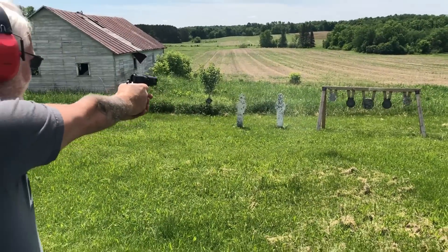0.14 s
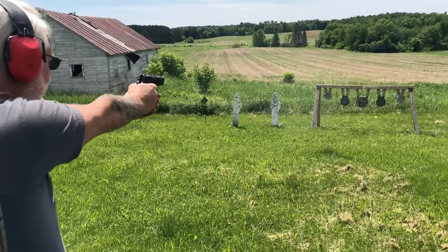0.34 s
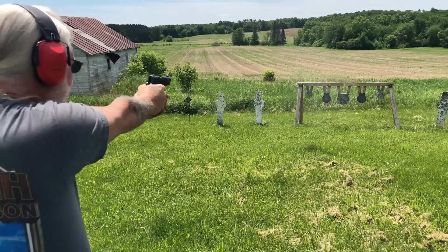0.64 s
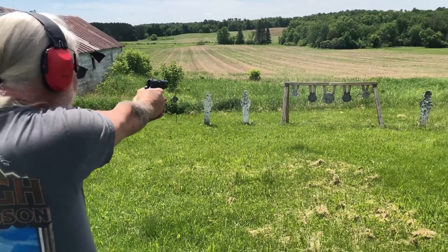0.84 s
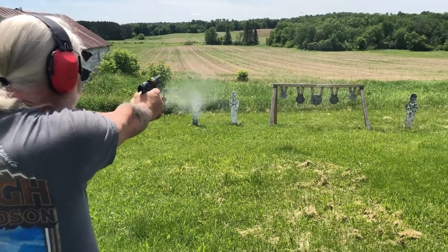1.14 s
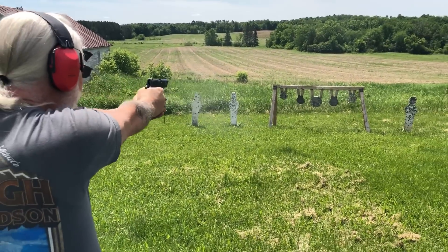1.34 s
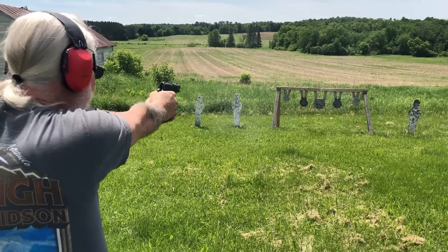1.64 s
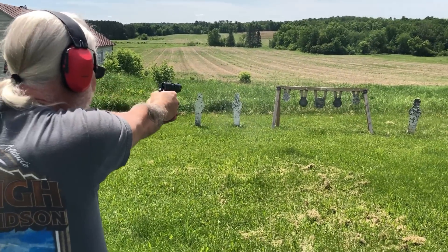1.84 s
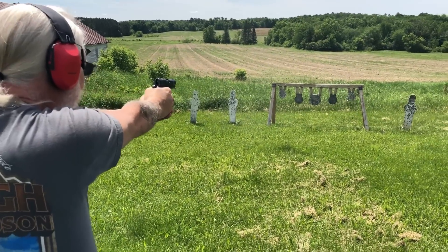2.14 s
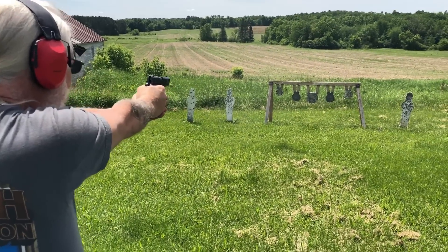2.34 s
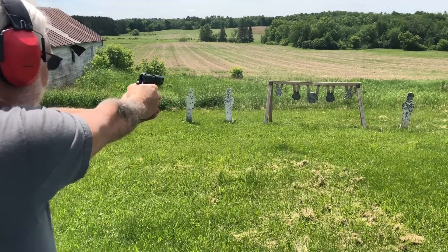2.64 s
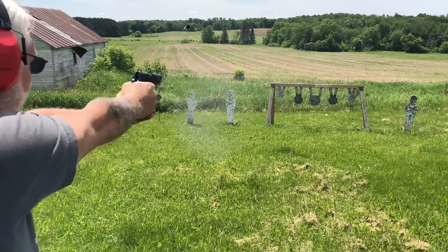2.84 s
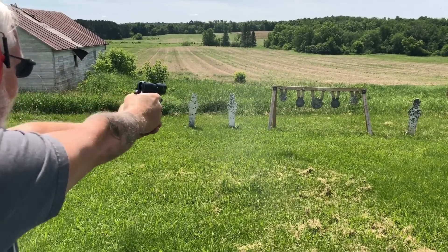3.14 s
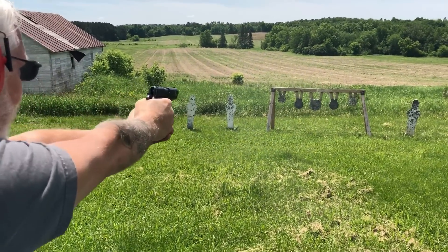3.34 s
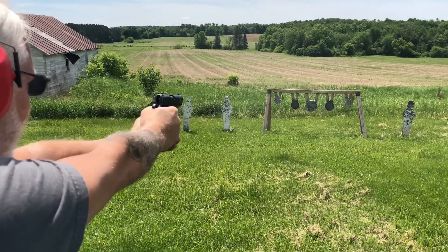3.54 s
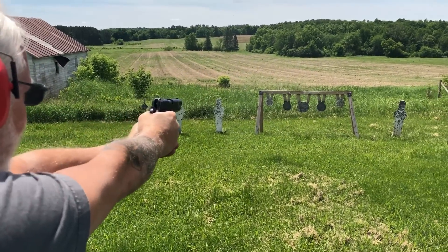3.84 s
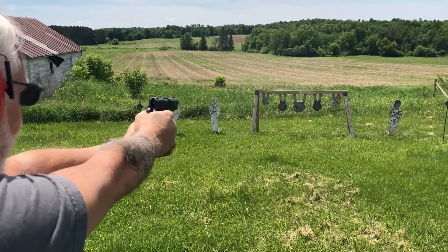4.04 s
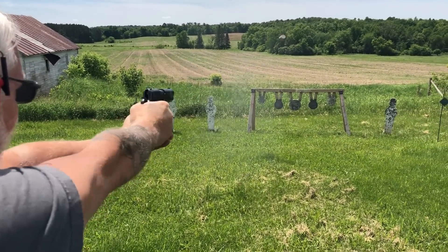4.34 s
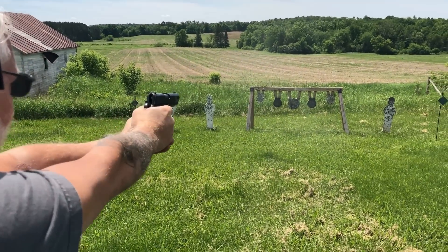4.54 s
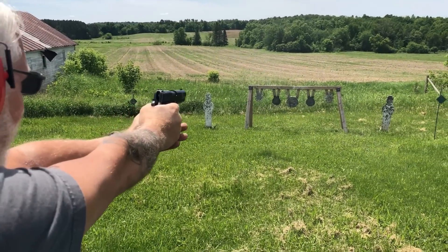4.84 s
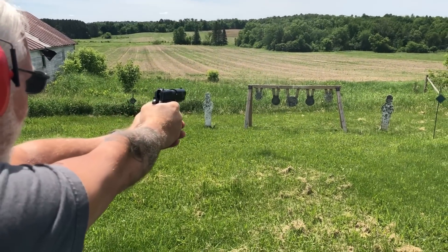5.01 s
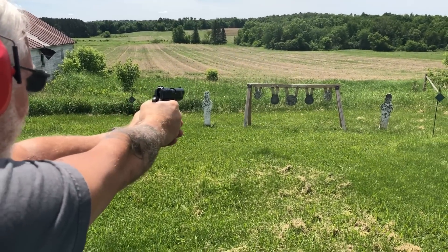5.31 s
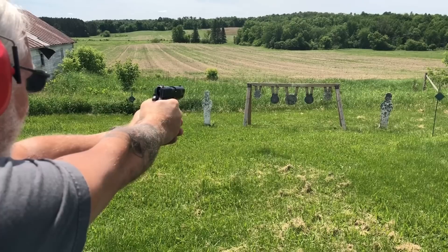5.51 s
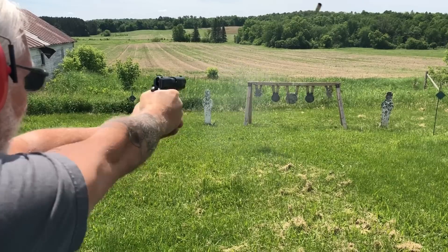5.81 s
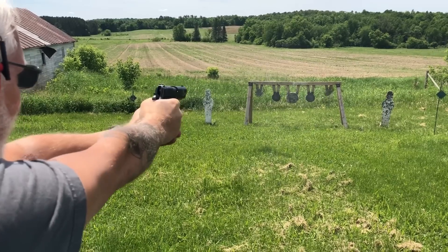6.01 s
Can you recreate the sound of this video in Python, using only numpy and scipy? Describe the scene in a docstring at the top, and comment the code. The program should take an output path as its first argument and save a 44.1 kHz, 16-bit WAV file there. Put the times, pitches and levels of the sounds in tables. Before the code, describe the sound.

Four close handgun shots crack across a grassy range, each followed by a bullet hit and soft echo; the first and last ring steel.

```python
"""A grassy outdoor range in a light breeze. A pistol fires four single shots about a metre from a small
microphone, overloading it. The slide cycles, each bullet smacks the targets, and twice the steel rings.
A barn and bushes slap back; a second later the far woods return a soft roll.
Faint around the shots: swells of hiss, grip ticks, a bump on the microphone, a far bird."""
import sys
import numpy as np
from scipy import signal
from scipy.fft import rfft, irfft
from scipy.io import wavfile
from scipy.ndimage import uniform_filter1d

SR = 44100
rng = np.random.default_rng(int(sys.argv[2]) if len(sys.argv) > 2 else 0)


def generate_wav(sig):
    """Save sig (samples, or channels by samples) to the path in sys.argv[1] as 16-bit PCM at SR."""
    pcm = np.round(np.clip(np.atleast_2d(sig).T, -1, 1) * 32767).astype(np.int16)
    wavfile.write(sys.argv[1], SR, pcm)


N = 272097
TIME_S = np.arange(N) / SR

# Each row: start in seconds, crack level in dB, crack t60 in seconds, then levels in dB of bark, boom,
# thump, slide, barn slap, echoes, first gas puff, second gas puff.
PISTOL_SHOTS = [(1.3259, -6.5, 0.0056, -15.5, -9.5, -25, -24.5, -7.5, -4, -49, -38.5),
                (2.9299, -7, 0.046, -24.5, -12.5, -21.5, -22, -12, -4, -47.5, -57.5),
                (4.4429, -8.5, 0.063, -22.5, -13, -19.5, -22.5, -12, -6, -29, -21.5),
                (5.8974, -9.5, 0.071, -24, -14.5, -20, -19, -10, -5.5, -25.5, -42)]
(FIRED_S, CRACK_DB, CRACK_T60_S, BARK_DB, BOOM_DB, THUMP_DB, SLIDE_DB, SLAP_DB, ECHO_DB,
 FIRST_PUFF_DB, SECOND_PUFF_DB) = np.transpose(PISTOL_SHOTS)
# Hollow note in the report. Each entry: one shot's level in dB.
HOLLOW_NOTE_DB = [-30, -33, -36.5, -36]
# Each row: peak time in seconds, level in dB, then rise, hold and t60 in seconds.
BULLET_HITS = [(1.389, -32.5, 0.0026, .004, .22), (3.011, -19, .006, 0.011, 0.044),
               (4.526, -17.5, 0.0078, .01, 0.095), (5.979, -24.5, .006, .006, .14)]
# Steel targets. Each row: frequency in Hz, relative level in dB, t60 in seconds.
SILHOUETTE_MODES = [(3520, -7, 0.47), (4430, -16, 0.5), (5535, -13, .25), (6150, 6, 0.25),
                    (6100, -30, 0.97), (6782, -14, .25), (7520, -21, .35), (8700, -0.5, .08),
                    (12120, -14.5, 0.17), (13700, -8.5, .07)]
PLATE_MODES = [(3600, -17, .44), (3760, -17, .25), (4430, -22, .22), (5010, -11.5, 0.33), (5840, 2, 0.082),
               (5850, -19, .5), (6210, -9.5, 0.38), (6820, -14, 0.23), (7450, -29, .25), (8720, 2.5, 0.23),
               (9320, -9, .15), (9500, -15, 0.36), (11290, -6, 0.16), (11460, -6, .11), (14020, -8, 0.17)]
# Each row: round trip in seconds, relative level in dB, then rise, hold and t60 in seconds.
WOOD_ECHOES = [(.93, -51.5, 0.046, 0.049, 1.2), (1.129, -52, 0.39, 0.14, 0.51),
               (1.428, -48, 0.057, 0.06, 1.7), (1.776, -44, 0.22, .08, 1.21)]
# Frames and bushes. Each row: round trip in seconds, relative thud and snap in dB, thud t60 in seconds.
NEAR_ECHOES = [(0.097, -26, -31, .06), (.108, -12, -32.5, 0.047), (.125, -12, -17.5, 0.071),
               (.132, -16, -29.5, 0.072), (0.15, -20.5, -25, 0.031), (0.168, -29, -27, .05),
               (.184, -27.5, -52, 0.062), (.193, -43, -49, .03), (.231, -29, -34, 0.065),
               (.249, -31, -42, 0.12), (.266, -43, -43, .09), (.287, -43, -49, 0.056),
               (.303, -41.5, -58, .07), (0.356, -40.5, -63, 0.06), (0.377, -40, -67, 0.049),
               (.481, -45.5, -65, 0.065), (0.503, -46.5, -66, 0.066), (.542, -56, -65, 0.042),
               (.629, -73, -77, .07)]
# Grass and brush scatter. Each row: frequency in Hz, t60 in seconds.
FIELD_DECAY = [(100, 0.226), (700, 0.3), (2500, 0.41), (6000, 0.33), (13000, 0.23)]
# Hiss. Each row: centre in seconds, level in dB, half-width in seconds.
FAINT_SWELLS = [(0.21, -69, 0.38), (0.862, -67.5, 0.059), (0.948, -61, 0.021), (1.035, -62, 0.027),
                (1.108, -65, 0.022), (1.267, -67, 0.091), (2.3, -69, 0.069), (2.623, -74, 0.024),
                (2.77, -71.5, 0.064), (4.335, -58, 0.0094), (4.393, -60.5, 0.034)]
# Handling. Each row: peak time in seconds, level in dB.
GRIP_TICKS = [(1.782, -69), (3.732, -69), (5.098, -63), (5.302, -68)]
HOUSING_BUMPS = [(3.675, -48)]
# Each row: centre in seconds, level in dB, start and end pitch in Hz, length in seconds.
BIRD_CHIRPS = [(5.711, -75, 5370, 5780, 0.012), (5.776, -68.5, 7450, 5890, .022)]
# Noise spectra. Each row: frequency in Hz, relative density in dB.
BREEZE_SPECTRUM = [(25, -31), (60, -13.5), (115, -8), (190, -16), (260, -18.5), (400, -9.5), (600, 0.5),
                   (900, -2), (1500, -12.5), (3000, -17.5), (5000, -26.5), (9000, -45), (15000, -48)]
HISS_SPECTRUM = [(500, -22), (1400, -1), (2500, 6.5), (5000, -2), (9000, -15), (15000, -18)]
ROLL_SPECTRUM = [(30, -37), (70, -14), (120, -8), (190, -16), (280, -15), (480, -3.5), (750, 2.5),
                 (1050, -2.5), (1600, -10), (3000, -19), (5000, -31.5), (9000, -50.5), (15000, -54)]
CRACK_SPECTRUM = [(40, -29), (90, -19), (160, -3), (330, -8.5), (480, -4.5), (950, -10), (1700, -9),
                  (3500, -8.5), (7000, -10.5), (15000, -13.5)]
BARK_SPECTRUM = [(300, -31.5), (1300, -2.5), (2050, -14.5), (2200, 7), (2420, 3.5), (2570, -14.5),
                 (3050, -1.5), (3600, -12.5), (3760, 5), (4300, 3), (4520, -17.5), (5250, -14), (5620, 1.5),
                 (5850, -14), (6600, -24.5), (15000, -38.5)]
BOOM_SPECTRUM = [(40, -40.5), (130, -25), (230, -10.5), (320, -9.5), (480, 6), (640, -1), (850, 7),
                 (1100, 4.5), (1700, -8.5), (4000, -22), (15000, -41.5)]
SLIDE_SPECTRUM = [(100, -17), (450, -4), (1000, 7.5), (2800, -10), (6000, -6.5), (15000, -10)]
FIELD_SPECTRUM = [(40, -23.5), (90, -9), (180, -12), (320, -12.5), (550, -6), (950, 0.5), (1600, -8),
                  (3500, -10.5), (7000, -13), (15000, -20.5)]
BRUSH_SPECTRUM = [(40, -24), (120, -12.5), (280, -16), (520, 4), (900, -5), (1800, -7), (4000, -10.5),
                  (7000, -18.5), (10000, -27), (15000, -36.5)]
SLAP_SPECTRUM = [(100, -23.5), (500, -7.5), (1000, -7.5), (2500, -14), (4000, -8.5), (8000, -15),
                 (15000, -12.5)]
IMPACT_SPECTRUM = [(40, -22), (130, -5.5), (400, -7.5), (1000, -5), (2500, 0.5), (5500, 1.5), (9000, -1),
                   (15000, -2)]
THUD_SPECTRUM = [(40, -42.5), (90, -2), (150, -18), (230, -10.5), (330, -3), (480, 6.5), (1000, 5),
                 (1700, -10), (3500, -19.5), (8000, -42.5)]
SNAP_SPECTRUM = [(300, -23), (1200, 0), (2500, 0.5), (5000, 1), (9000, -1.5), (15000, -15.5)]


def from_db(db):
    """Decibels to gain."""
    return 10 ** (np.asarray(db) / 20)


def at_hz(table, hz):
    """Table lookup along log frequency."""
    known_hz, values = np.transpose(table)
    return np.interp(np.log(np.maximum(hz, 1)), np.log(known_hz), values)


def colour(x, spectrum, size=4096):
    """Minimum-phase filter; white noise keeps its level."""
    bins_hz = np.arange(size // 2 + 1) * SR / size
    cepstrum = irfft(np.log(from_db(at_hz(spectrum, bins_hz))))
    cepstrum[1:size // 2] *= 2
    cepstrum[size // 2 + 1:] = 0
    response = irfft(np.exp(rfft(cepstrum)))
    return signal.oaconvolve(x, response / np.linalg.norm(response))[:N]


def lowpass(x, hz, order=2):
    """Butterworth low-pass."""
    return signal.sosfilt(signal.butter(order, hz, fs=SR, output="sos"), x + 1e-18)


def bandpass(x, low_hz, high_hz):
    """Butterworth band-pass."""
    return signal.sosfilt(signal.butter(3, [low_hz, high_hz], "band", fs=SR, output="sos"), x)


def grains(spread_db):
    """Dense clicks of uneven size, rms 1."""
    noise = rng.standard_normal(N)
    noise *= from_db(spread_db * np.repeat(rng.standard_normal(N // 16 + 1), 16)[:N])
    return noise / noise.std()


def even_noise(spectrum, spread_db, window_s=0.0032):
    """Coloured grains held at rms 1, so a short burst hits at full force."""
    noise = colour(grains(spread_db), spectrum)
    return noise / np.sqrt(uniform_filter1d(noise ** 2, int(window_s * SR)) + 1e-12)


def flutter(depth_db, rate_hz):
    """Randomly wandering gain."""
    slow = lowpass(rng.standard_normal(N), rate_hz)
    return from_db(depth_db * slow / slow.std())


def swell(peak_s, rise_s, t60_s, hold_s=0):
    """Envelope: linear rise to 1, hold, exponential decay."""
    start, stop = np.searchsorted(TIME_S, [peak_s - rise_s, peak_s + hold_s + 2 * t60_s])
    t = TIME_S[start:stop] - peak_s
    out = np.zeros(N)
    out[start:stop] = np.minimum(1 + t / rise_s, 1) * from_db(-60 * np.maximum(t - hold_s, 0) / t60_s)
    return out


def after_shots(levels_db, delay_s, rise_s, t60_s, hold_s=0):
    """One swell per shot, peaking delay_s after it."""
    length = int((delay_s + hold_s + 2 * t60_s) * SR)
    shape = swell(delay_s, min(rise_s, delay_s), t60_s, hold_s)[:length]
    out = np.zeros(N)
    for start, db in zip((FIRED_S * SR).astype(int), levels_db):
        out[start:start + len(shape)] += from_db(db) * shape[:N - start]
    return out


def far_return(delay_s, gain_db, rise_s, hold_s, t60_s, earlier_s=-0.55, earlier_db=-2.5):
    """Distant echo envelope. Shots add in power, including one fired before the scene opens."""
    shots = [(earlier_s, earlier_db), *zip(FIRED_S, ECHO_DB)]
    returns = [from_db(gain_db + db) * swell(at_s + delay_s, rise_s, t60_s, hold_s) for at_s, db in shots]
    return np.sqrt(sum(echo ** 2 for echo in returns))


def breeze(level_db=-59):
    """Light air moves unevenly through grass."""
    gusts = from_db(level_db) * flutter(depth_db=2.0, rate_hz=33.0)
    return colour(gusts * grains(0.8), BREEZE_SPECTRUM)


def faint_hiss():
    """Faint, bright swells of hiss before and between the shots."""
    swells = sum(from_db(db) * np.exp(-((TIME_S - at_s) / half_width_s) ** 2)
                 for at_s, db, half_width_s in FAINT_SWELLS)
    return colour(swells * grains(3.0), HISS_SPECTRUM)


def far_rumble():
    """Rising ground returns only the bass, ahead of the woods."""
    bass = bandpass(rng.standard_normal(N), low_hz=70.0, high_hz=135.0)
    return far_return(delay_s=0.85, gain_db=-65.0, rise_s=0.23, hold_s=0.34, t60_s=1.2) * bass / bass.std()


def far_roll():
    """Countless trees return each shot as a soft, uneven roll."""
    envelope = np.sqrt(sum(far_return(*wood) ** 2 for wood in WOOD_ECHOES))
    return colour(envelope * flutter(depth_db=2.0, rate_hz=7.5) * grains(3.5), ROLL_SPECTRUM)


def blasts(shock_s=0.0012, ground_s=0.0078, ground_db=-7.0):
    """N-shaped shock, a bright crack, a hard bark at 2-6 kHz, a dull boom, ground bounce."""
    shock, burst = np.zeros((2, N))
    for at_s, db, t60_s in zip(FIRED_S, CRACK_DB, CRACK_T60_S):
        phase = (TIME_S - at_s - shock_s) / shock_s
        shock += from_db(db) * (1 - 2 * phase) * ((phase >= 0) & (phase < 1))
        burst += from_db(db) * swell(at_s + 0.002, rise_s=0.0005, t60_s=t60_s, hold_s=0.0005)
    crack = shock + colour(burst * grains(1.4), CRACK_SPECTRUM)
    bark = after_shots(BARK_DB, delay_s=0.0015, rise_s=0.0015, t60_s=0.09, hold_s=0.0052)
    bark *= even_noise(BARK_SPECTRUM, 0.4)
    boom = after_shots(BOOM_DB, delay_s=0.00064, rise_s=0.00064, t60_s=0.077, hold_s=0.0065)
    boom *= even_noise(BOOM_SPECTRUM, 0.33)
    bounce = lowpass(np.interp(TIME_S - ground_s, TIME_S, crack), hz=4700.0)
    return crack + bark + boom + from_db(ground_db) * bounce


def knocks(hz=227.4):
    """A low, hollow note rings briefly in each report."""
    envelope = after_shots(HOLLOW_NOTE_DB, delay_s=0.003, rise_s=0.003, t60_s=0.21)
    return envelope * np.sin(2 * np.pi * hz * TIME_S)


def air_push(levels_db, delay_s, hz, width_s):
    """One heavily damped low swing of air per shot."""
    out = np.zeros(N)
    for at_s, db in zip(FIRED_S + delay_s, levels_db):
        t = TIME_S - at_s - width_s
        out += from_db(db - 1.5) * np.exp(-(t / width_s) ** 2) * np.sin(2 * np.pi * hz * t)
    return out


def puffs():
    """A low thump, then two gusts of muzzle gas, reach the microphone."""
    return (air_push(THUMP_DB, delay_s=0.003, hz=195.0, width_s=0.006)
            + air_push(FIRST_PUFF_DB, delay_s=0.016, hz=71.0, width_s=0.0077)
            + air_push(SECOND_PUFF_DB, delay_s=0.066, hz=71.0, width_s=0.0077))


def slide():
    """The slide rattles forward, louder until it locks."""
    travel = after_shots(SLIDE_DB, delay_s=0.047, rise_s=0.041, t60_s=0.061, hold_s=0.019)
    return colour(travel * grains(4.3), SLIDE_SPECTRUM)


def field():
    """Scatter from the lawn, then from brush, where each band has its own decay."""
    brush = colour(grains(2.0), FIELD_SPECTRUM)
    lawn = after_shots(ECHO_DB - 20.0, delay_s=0.027, rise_s=0.0024, t60_s=0.041)
    out = lawn * colour(grains(0.98), FIELD_SPECTRUM)
    edges_hz = np.geomspace(30, 17000, 9)
    for low_hz, high_hz in zip(edges_hz, edges_hz[1:]):
        t60_s = at_hz(FIELD_DECAY, np.sqrt(low_hz * high_hz))
        envelope = after_shots(ECHO_DB - 18.5, delay_s=0.12, rise_s=0.048, t60_s=t60_s)
        out += bandpass(brush * envelope, low_hz, high_hz)
    return out


def hedges():
    """Far hedges return a thin, lumpy tail."""
    tail = after_shots(ECHO_DB - 50.0, delay_s=0.19, rise_s=0.16, t60_s=1.75)
    return colour(tail * flutter(depth_db=2.0, rate_hz=44.0) * grains(4.2), BRUSH_SPECTRUM)


def steel(modes, peak_s, gain_db, rise_s, clang_db, clang_t60_s):
    """Uneven steel rings in beating mode pairs over a weak clang; shaking on its mount wavers the pitch."""
    split_hz, twin_db = 37.0, -12.5
    waver_depth_hz, shake_hz = 9.1, 141.1
    clang = [(hz, clang_db, clang_t60_s) for hz in rng.uniform(3000, 14500, 30)]
    out = np.zeros(N)
    for hz, db, t60_s in [*modes, *clang]:
        envelope = swell(peak_s, rise_s, t60_s)
        live = np.flatnonzero((envelope > 0) & (TIME_S < peak_s + t60_s))[:SR]
        waver = lowpass(rng.standard_normal(SR), shake_hz)
        pitch_hz = hz + waver_depth_hz * waver[:len(live)] / waver.std()
        turns = np.cumsum(pitch_hz) / SR + rng.random()
        twin_turns = turns + split_hz * rng.uniform(0.21, 3.9) * (TIME_S[live] - peak_s)
        pair = np.sin(2 * np.pi * turns) + from_db(twin_db) * np.sin(2 * np.pi * twin_turns)
        out[live] += from_db(gain_db + db) * envelope[live] * pair
    return out


def barn_wall(delay_s, start_hz, fall_s, chirp_db, slap_db, end_hz=583.0):
    """A ribbed wall returns a sharp slap, drawn out into a falling chirp."""
    last_shot_s = FIRED_S[np.maximum(np.searchsorted(FIRED_S, TIME_S) - 1, 0)]
    age_s = np.maximum(TIME_S - last_shot_s - delay_s, 0)
    hz = end_hz + (start_hz - end_hz) * np.exp(-age_s / fall_s)
    slap = after_shots(SLAP_DB + slap_db, delay_s + 0.0006, rise_s=0.00057, t60_s=0.018)
    chirp = after_shots(SLAP_DB + chirp_db, delay_s + 0.00092, rise_s=0.0004, t60_s=0.016, hold_s=0.0012)
    return slap * even_noise(SLAP_SPECTRUM, 3.7) + chirp * np.sin(2 * np.pi * np.cumsum(hz) / SR)


def impacts():
    """Each bullet breaks up in a bright spray of fragments."""
    spray = sum(from_db(db) * swell(at_s, rise_s, t60_s, hold_s)
                for at_s, db, rise_s, hold_s, t60_s in BULLET_HITS)
    return spray * even_noise(IMPACT_SPECTRUM, 1.5)


def near_echoes():
    """Each target frame or bush returns a bright snap and a dull thud."""
    thud_power, snaps = np.zeros((2, N))
    for delay_s, thud_db, snap_db, t60_s in NEAR_ECHOES:
        thud_power += after_shots(ECHO_DB + thud_db, delay_s, rise_s=0.005, t60_s=t60_s) ** 2
        snaps += after_shots(ECHO_DB + snap_db, delay_s, rise_s=0.0012, t60_s=0.035)
    thuds = np.sqrt(thud_power) * even_noise(THUD_SPECTRUM, 2.53)
    return thuds + colour(snaps * grains(4.8), SNAP_SPECTRUM)


def ticks():
    """Tiny bright contacts of grip and trigger."""
    contacts = sum(from_db(db) * swell(at_s, rise_s=0.001, t60_s=0.018) for at_s, db in GRIP_TICKS)
    return colour(contacts * grains(4.6), IMPACT_SPECTRUM)


def bump():
    """A finger nudges the microphone housing: a short, dull rumble."""
    rumble = lowpass(rng.standard_normal(N), hz=225.0, order=4)
    nudge = sum(from_db(db) * swell(at_s, rise_s=0.0082, t60_s=0.1) for at_s, db in HOUSING_BUMPS)
    return nudge * rumble / rumble.std()


def bird():
    """A small far bird: short, gliding, uneven whistles."""
    waver = flutter(depth_db=5.0, rate_hz=300.0)
    out = np.zeros(N)
    for at_s, db, start_hz, end_hz, length_s in BIRD_CHIRPS:
        hz = np.interp(TIME_S, [at_s - length_s / 2, at_s + length_s / 2], [start_hz, end_hz])
        envelope = from_db(db) * np.exp(-(2 * (TIME_S - at_s) / length_s) ** 2)
        out += waver * envelope * np.sin(2 * np.pi * np.cumsum(hz) / SR)
    return out


def scene():
    """Gun, targets, echoes and background, mono."""
    gun = blasts() + slide() + puffs() + knocks()
    targets = impacts()
    targets += steel(SILHOUETTE_MODES, peak_s=1.419, gain_db=-26.0, rise_s=0.044,
                     clang_db=-21.5, clang_t60_s=0.32)
    targets += steel(PLATE_MODES, peak_s=5.98, gain_db=-20.5, rise_s=0.015,
                     clang_db=-18.0, clang_t60_s=0.16)
    far_wall = barn_wall(delay_s=0.1232, start_hz=6933.0, fall_s=0.0041, chirp_db=-14.5, slap_db=-17.0)
    near_wall = barn_wall(delay_s=0.0602, start_hz=3440.0, fall_s=0.0024, chirp_db=-3.5, slap_db=-0.5)
    echoes = near_wall + far_wall + near_echoes() + field() + hedges() + far_roll() + far_rumble()
    background = ticks() + faint_hiss() + bump() + breeze() + bird()
    return (gun + targets + echoes + background)[None]


def record(dry, ceiling=0.9, cutoff_hz=15800):
    """Microphone overload: soft clip, then a steep low-pass."""
    clipped = ceiling * np.tanh(dry / ceiling)
    return signal.sosfilt(signal.ellip(10, 0.1, 80, cutoff_hz, fs=SR, output="sos"), clipped)


dry = scene()
out = record(dry)
generate_wav(out)
```